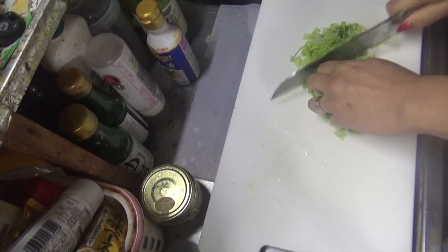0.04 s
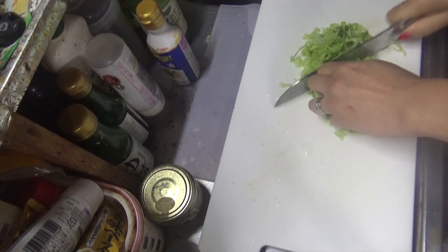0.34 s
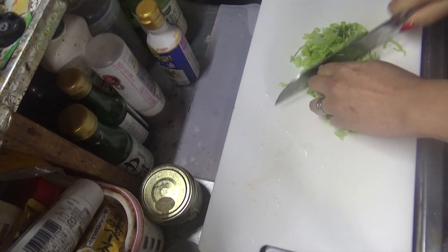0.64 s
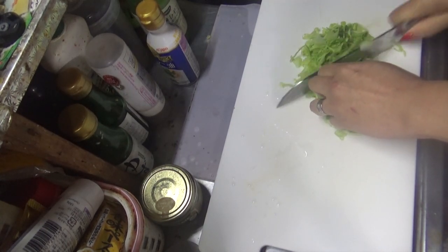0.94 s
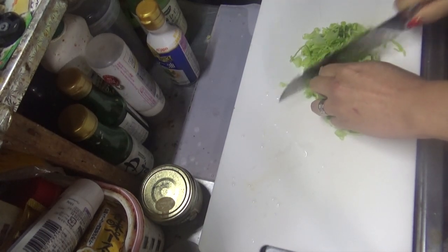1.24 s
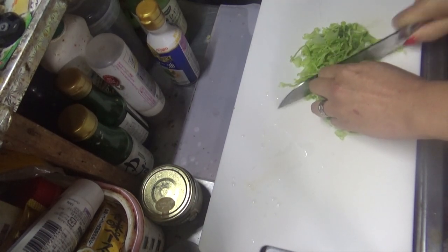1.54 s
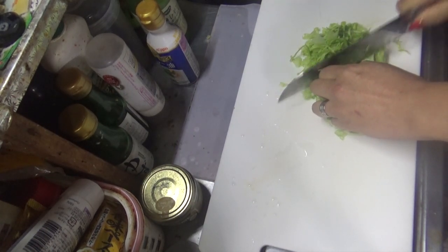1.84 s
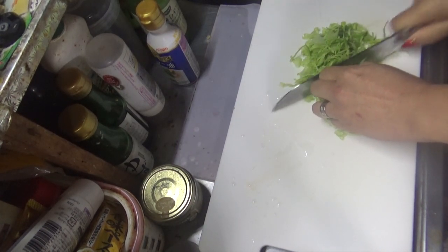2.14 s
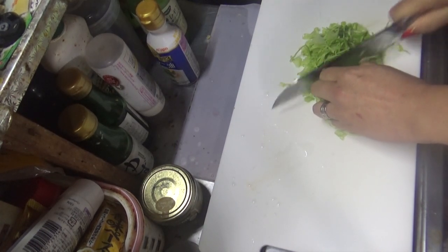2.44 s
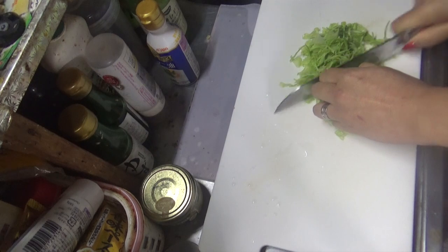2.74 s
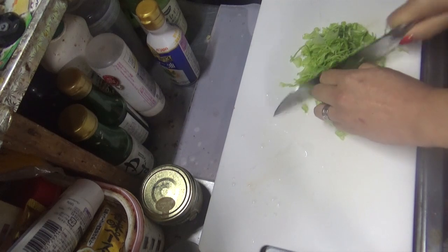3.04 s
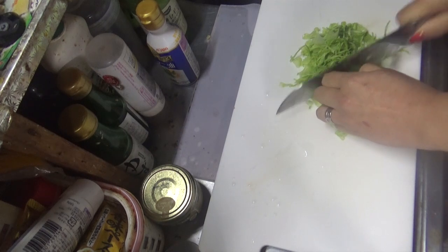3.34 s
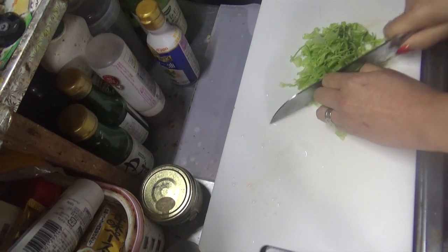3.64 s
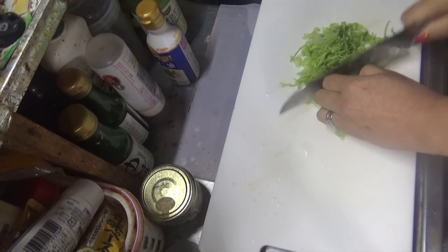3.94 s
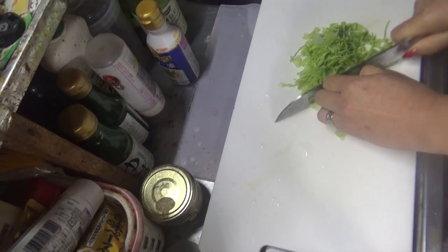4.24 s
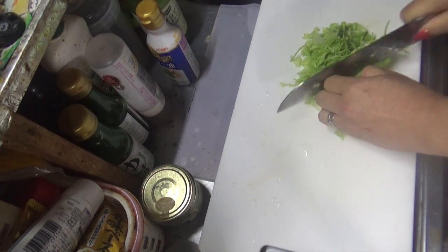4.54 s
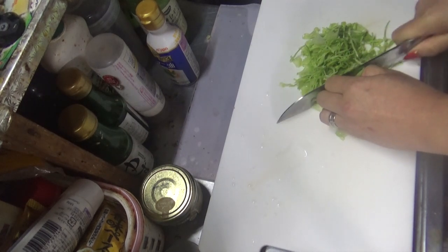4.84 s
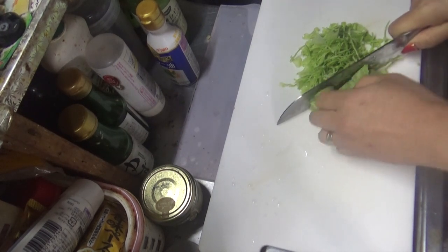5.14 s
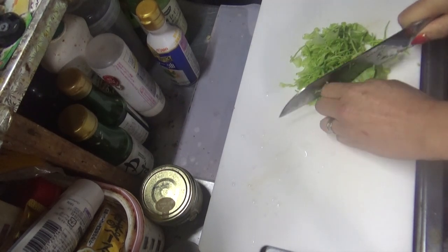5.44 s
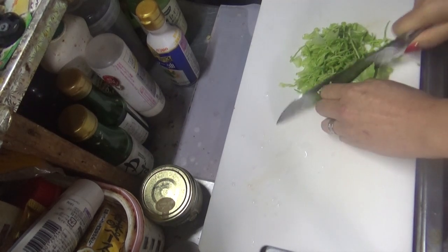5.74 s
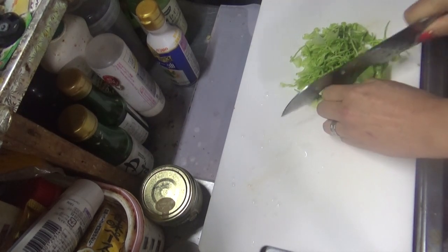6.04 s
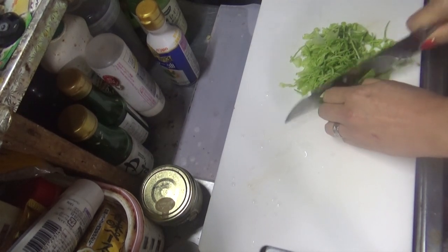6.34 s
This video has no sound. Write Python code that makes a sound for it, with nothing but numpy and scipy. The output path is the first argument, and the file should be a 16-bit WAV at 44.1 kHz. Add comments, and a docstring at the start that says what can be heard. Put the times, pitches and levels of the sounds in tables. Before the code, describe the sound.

Close, rapid crunches of cabbage being sliced, each with a light knock of knife on plastic board, pausing briefly before continuing.

```python
"""A kitchen knife shreds cabbage on a plastic board, about five strokes a second, with one pause to regather.
Crisp cells and ribs fail by brittle fracture, so each cut is a swarm of tiny impulses over a duller tearing.
The landing edge excites the damped modes of board and blade; on the way up, wet shreds crackle by stick-slip.
The microphone is close, in a small hard kitchen with a short reverberation and a faint hum and hiss."""
import sys
import numpy as np
from scipy import signal
from scipy.fft import rfft, irfft
from scipy.io import wavfile
from scipy.ndimage import uniform_filter1d

SR = 44100
rng = np.random.default_rng(int(sys.argv[2]) if len(sys.argv) > 2 else 0)


def dump(signal):
    """Clip the signal to [-1, 1] and save it as 16-bit WAV at the path in sys.argv[1]."""
    limited = np.clip(np.atleast_2d(signal).T, -1, 1)
    pcm = np.round(limited * 32767).astype(np.int16)
    wavfile.write(sys.argv[1], SR, pcm)


N = 289737
TIME = np.arange(N) / SR
TOP_HZ = 15650  # upper band limit


def undb(db):
    """Amplitude ratio of a level in decibels."""
    return 10 ** (np.asarray(db) / 20)


def unit(x):
    """Normalisation to unit energy."""
    return x / np.sqrt(np.sum(x ** 2))


def fade(t, t60):
    """Exponential decay, 60 dB in t60 seconds."""
    return np.exp(-np.log(1000) * t / t60)


def add(out, s, sound):
    """Superposition of a sound at time s."""
    i = max(int(s * SR), 0)
    out[i:i + len(sound)] += sound[:max(N - i, 0)]


def colour(x, spectrum, size=2048):
    """Minimum-phase filtering by the folded cepstrum; white input keeps its power."""
    hz, db = np.transpose(spectrum)
    bins = np.maximum(np.fft.rfftfreq(size, 1 / SR), 1)
    magnitude = undb(np.interp(np.log(bins), np.log(hz), db))
    cepstrum = irfft(np.log(magnitude))
    cepstrum[1:size // 2] *= 2
    cepstrum[size // 2 + 1:] = 0
    response = unit(irfft(np.exp(rfft(cepstrum))))
    return signal.fftconvolve(x, response)[:len(x)]


def swell(times, dbs, edge_s):
    """Amplitude envelope, piecewise linear in decibels, ramped at both ends."""
    ramp = np.clip(np.minimum(TIME - times[0], times[-1] - TIME) / edge_s + .5, 0, 1)
    gain, on = np.zeros(N), ramp > 0
    gain[on] = ramp[on] * undb(np.interp(TIME[on], times, dbs))
    return gain


def pips(spectrum, ring_s, even_s, count=12000):
    """Free vibration: each bursting cell or vein pings at its own pitch; mean power levelled to one."""
    out = np.zeros(N)
    t = np.arange(SR // 40) / SR
    decay = fade(t, ring_s)
    for when, pitch, size in rng.random((count, 3)):
        add(out, when * N / SR, (.5 + size) * np.sin(2 * np.pi * pitch * TOP_HZ * t) * decay)
    out = colour(out, spectrum)
    return out / np.sqrt(uniform_filter1d(out ** 2, int(even_s * SR)) + 1e-9)


def bursts(per_s, spread_db, ring_s, even_s):
    """Poisson process: fibres give way in unequal noise bursts; mean power levelled to one."""
    sizes = undb(spread_db * np.minimum(rng.exponential(size=N), 4))
    impulses = sizes * (rng.random(N) < per_s / SR)
    t = np.arange(SR // 50) / SR
    power = np.maximum(signal.fftconvolve(impulses ** 2, fade(t, ring_s) ** 2)[:N], 0) + 1e-9
    return rng.standard_normal(N) * np.sqrt(power / uniform_filter1d(power, int(even_s * SR)))


# Spectra of bursting cells, torn fibres and fine spray: f/Hz, density level/dB
CELL_SPECTRUM = [(60, -55), (200, -25.5), (500, -26.5), (1000, -43), (3000, -13), (4800, -15.5), (5700, -8),
                 (6400, 1), (7500, -1.5), (8700, -10), (12000, -12.5), (14000, -17), (16000, -43)]
FIBRE_SPECTRUM = [(25, -59), (60, -17.5), (150, -3.5), (400, -5.5), (800, -2.5), (1100, -5), (1700, 3.5),
                  (2600, -4.5), (4000, 0.5), (6000, 2.5), (12000, -10)]
SPRAY_SPECTRUM = [(60, -56), (5000, -51), (8000, 12.5), (9500, 1.5), (12000, 10), (14000, -9), (16000, 12)]
# Knife strokes: entry t/s, landing t/s, crunch level/dB, first bite/dB re crunch, spray/dB re crunch,
# knock level/dB, thud/dB re knock, clack level/dB, rubbing level/dB
KNIFE_STROKES = [(.002, 0.011, -11, 10, -5, -23.5, -7.5, -31, -41),
                 (0.18, 0.215, -12, -1, 4, -22, -10.5, -41, -36),
                 (0.377, .409, -12, 4, 2.5, -25.5, -3, -38, -31),
                 (0.562, 0.62, -11, -9.5, -16, -23, -3.5, -22, -29.5),
                 (0.776, 0.814, -10.5, -2.5, 2, -24, -9, -45, -29.5),
                 (0.97, 1.006, -11, 1.5, 3, -24.5, -4.5, -22.5, -25.5),
                 (1.158, 1.207, -13, -9.5, -3, -25.5, -0.5, -52, -34.5),
                 (1.374, 1.406, -11, -4.5, 4, -26, -2, -52, -28.5),
                 (1.561, 1.587, -21, -9, 12, -25, 1, -24, -27),
                 (1.762, 1.794, -17.5, -4.5, -12, -25, 2.5, -22.5, -34),
                 (1.966, 2.012, -14.5, -5.5, 6, -33.5, -1, -51, -27.5),
                 (2.16, 2.211, -16.5, -5.5, -10, -25.5, 1, -23, -30),
                 (2.36, 2.405, -19.5, -3, -16, -25.5, 3, -21.5, -28),
                 (2.565, 2.609, -11.5, -6.5, -16, -25.5, -2, -21, -29.5),
                 (2.772, 2.815, -11, -4.5, 0, -31.5, -3, -36, -35.5),
                 (2.979, 3.027, -13, -4, -2, -26, -1.5, -58, -37),
                 (3.195, 3.231, -11.5, -0.5, 4, -24.5, -4, -45, -30.5),
                 (3.409, 3.448, -11, -7.5, -1, -27, -3.5, -29, -26),
                 (3.603, 3.65, -12, -8, -12, -27.5, 0, -28, -25.5),
                 (3.799, 3.843, -11, -10.5, -6, -26.5, 0.5, -23.5, -26.5),
                 (4.016, 4.062, -12, 0.5, -18, -40, 5, -55, -27),
                 (4.235, 4.265, -10, -6, -3, -26.5, 1, -26, -27),
                 (4.446, 4.485, -10.5, -10, 7, -29, -0.5, -50, -26),
                 (4.644, 4.689, -10.5, -14, -8, -26.5, -0.5, -25, -31),
                 (4.857, 4.89, -14.5, -5, -15, -27, -1.5, -30, -44),
                 (5.662, 5.709, -12.5, -6, -18, -30.5, 1.5, -35, -31),
                 (5.897, 5.949, -10.5, -3.5, 5, -33.5, 0.5, -53, -39),
                 (6.149, 6.199, -12.5, -4, -4, -30, 0, -42, -31),
                 (6.403, 6.458, -10, -4, 5.5, -30.5, -2, -53, -47)]
# The heel of the blade drops after some strokes: t/s, crunch level/dB, knock level/dB
HEEL_DROPS = [(1.621, -24, -26.5), (1.823, -23.5, -27.5), (4.29, -20.5, -28), (4.918, -38.5, -40)]


def cutting():
    """Brittle fracture: the edge bursts cells, and fibres tear more as the pile is compressed."""
    lag_s, bite_s, press_s, graze_s = .001, .004, .032, .008
    midway_db, pinch_db, press_db, release_db = -1.05, -0.06, -15, -25
    squeeze_db = 3 * np.array([-3.0, -1.6, -1.5, 0.08, 1.2, -1.0])
    heel_s, heel_bite_db, heel_spray_db = .025, 2.5, -21
    cuts = [(enters, lands + lag_s, db, bite_db, spray_db)
            for enters, lands, db, bite_db, spray_db, *_ in KNIFE_STROKES]
    cuts += [(s, s + heel_s, db, heel_bite_db, heel_spray_db) for s, db, _ in HEEL_DROPS]
    crisp, dull, fine = np.zeros((3, N))
    for start, end, db, bite_db, spray_db in cuts:
        descent = np.interp([0, 1 / 6, 1 / 2, 7 / 8], [0, 1], [start, end])
        times = [*descent, end + press_s / 2, end + press_s]
        shape_db = np.array([bite_db, bite_db, midway_db, pinch_db, press_db, release_db])
        push = swell(times, db + shape_db, edge_s=bite_s)
        graze = swell([start - graze_s, start], [db - 24, db - 14], edge_s=0.0013)  # loose top shreds
        tear_db = -10.5 + 0.49 * db - 0.92 * start  # falls as the knife reaches crisper leaves
        crisp = np.maximum(crisp, push + graze)
        fine = np.maximum(fine, push * undb(spray_db))
        dull = np.maximum(dull, swell(times, tear_db + shape_db + squeeze_db, edge_s=bite_s))
    cells = crisp * pips(CELL_SPECTRUM, ring_s=.018, even_s=.008)
    cracks = crisp * bursts(per_s=1500, spread_db=0.5, ring_s=0.0033, even_s=0.0042)
    spray = fine * bursts(per_s=3700, spread_db=5, ring_s=0.0052, even_s=0.013)
    fibres = dull * bursts(per_s=1200, spread_db=2.5, ring_s=0.0043, even_s=0.021)
    veins = dull * pips(FIBRE_SPECTRUM, ring_s=.025, even_s=.012)
    return (undb(-3) * cells + undb(-2.5) * colour(cracks, CELL_SPECTRUM)
            + undb(-10) * colour(spray, SPRAY_SPECTRUM)
            + undb(-1.5) * colour(fibres, FIBRE_SPECTRUM) + undb(-4.5) * veins)


# Spectrum of the ambient noise: f/Hz, density level/dB
KITCHEN_SPECTRUM = [(18, -38), (30, -25), (117, -16.5), (389, -8), (479, -14.5), (787, -4.5), (874, -20),
                    (996, -9.5), (1230, -20), (3230, -15), (4540, -14), (7080, -6), (8720, -10),
                    (15500, -16)]


def kitchen_noise():
    """Stationary filtered noise: the faint hum and hiss of the kitchen."""
    return undb(-49) * colour(rng.standard_normal(N), KITCHEN_SPECTRUM)


def landings():
    """Impacts that excite blade and board: t/s, knock level/dB, thud/dB re knock, clack level/dB."""
    heel_thud_db, heel_clack_db = 4.5, -39
    edges = [(lands, db, thud_db, clack_db) for _, lands, *_, db, thud_db, clack_db, _ in KNIFE_STROKES]
    return edges + [(s, db, heel_thud_db, heel_clack_db) for s, _, db in HEEL_DROPS]


# Modes of the steel blade, damped by the hand: f/Hz, level/dB, T60/s
BLADE_MODES = [(1630, -3, 0.071), (2017, 8.5, 0.013), (2338, 4, 0.034), (2610, 3, 0.034), (2742, -1, 0.11),
               (3480, -19, 0.15), (5300, -23, 0.084), (6250, -1.5, 0.056), (8350, -15, 0.045)]
# Light taps of the blade between strokes: t/s, level/dB
BLADE_TAPS = [(.134, -48), (1.322, -49), (5.265, -54), (5.335, -49)]


def blade_ringing(crunch):
    """Forced and free vibration: the crunch drives the blade's modes, and impacts make them clack."""
    t = np.arange(SR // 6) / SR
    hz, mode_db, t60 = np.transpose(BLADE_MODES)[:, :, None]
    decays = undb(mode_db) * fade(t, t60)  # one row a mode
    response = unit(np.sum(decays * np.sin(2 * np.pi * hz * t), axis=0))
    out = undb(-18) * signal.fftconvolve(crunch, response)[:N]
    contact = fade(t, t60=0.075) * (1 - np.exp(-t / 0.0008))  # the board adds damping
    for s, *_, clack_db in landings() + BLADE_TAPS:
        # The point of contact weights and detunes the modes.
        spot, load, phase = rng.standard_normal((3, len(hz), 1))
        tones = np.sin(2 * np.pi * (hz * (1 + 0.012 * load) * t + phase))
        ring = np.sum(decays * undb(2 * spot) * tones, axis=0)
        add(out, s - .002, undb(clack_db + 4.5) * ring * contact)
    return out


# Modes of the board on its counter: f/Hz, level/dB, T60/s
BOARD_MODES = [(70.4, -33.5, 0.62), (144, -12.5, 0.22), (164.5, -32, 0.24), (221.9, 4, 0.11),
               (248.3, 7.5, 0.099), (273.8, -7, 0.19), (325.7, -10.5, 0.27), (371.1, -0.3, 0.21),
               (394.5, -11, 0.27), (471, 1, 0.19), (521, -3.5, 0.12), (579, -4, 0.2), (612.5, -8.5, 0.26),
               (637, -4.5, 0.17), (705.5, 0.5, 0.06), (799, -9, 0.21), (772, -0.5, 0.05), (842, -8.5, 0.23),
               (892, -3, 0.1), (858, -26, 0.69), (1070, -7.5, 0.14), (1197, -2.5, 0.062), (1360, -14, 0.15)]
# Spectrum of the edge's blow: f/Hz, density level/dB
BLOW_SPECTRUM = [(25, -48), (50, -26), (150, -5), (250, -20.5), (450, -1.5), (750, 5), (1100, -7.5),
                 (2500, -14.5), (5000, -22), (12000, -39)]


def board_knocking():
    """Impact excitation: a short broadband blow, and plate modes that build up over a few cycles."""
    modes, blows = np.zeros((2, N))
    t = np.arange(SR // 4) / SR
    hz, mode_db, t60 = np.transpose(BOARD_MODES)[:, :, None]
    build_cycles, thud_hz, upper_hz = .8, 320, 550
    envelopes = fade(t, t60) * (1 - np.exp(-t * hz / build_cycles))
    polarity = (-1) ** np.arange(len(hz))[:, None]
    for s, db, thud_db, _ in landings():
        upper_db = -3 + 0.78 * s  # upper modes gain as the knife works across the board
        band_db = np.where(hz < thud_hz, thud_db, 0) + np.where(hz > upper_hz, upper_db, 0)
        # Each stroke lands on a different spot and loads the board differently.
        spot, load, phase = rng.standard_normal((3, len(hz), 1))
        gains = polarity * undb(mode_db + 2 * spot + band_db)
        tones = np.sin(2 * np.pi * hz * (1 + 0.0096 * load) * t + .5 * phase)
        add(modes, s, undb(db + 3.5) * np.sum(gains * envelopes * tones, axis=0))
        blow = rng.standard_normal(len(t)) * fade(t, t60=0.08) * (1 - np.exp(-t / 0.00023))
        add(blows, s, undb(db + upper_db / 2 + 7) * blow)
    return modes + colour(blows, BLOW_SPECTRUM)


# Thick ribs breaking, and at 5.266 and 5.333 s the click of the blade lightly tapping the board in the pause:
# t/s, level/dB
RIB_SNAPS = [(.074, -18), (0.134, -26.5), (.181, -9), (0.317, -24), (0.577, -5), (0.971, -8), (1.156, -10),
             (1.17, -18), (1.378, -1), (1.587, -2.5), (1.645, -10.5), (1.765, -14), (1.793, -8),
             (1.834, -6.5), (1.916, -17), (2.054, -24), (2.405, -7.5), (2.481, -21.5), (2.543, -13),
             (2.569, -5.5), (3.418, -2), (3.531, -15), (3.553, -17), (3.804, -5.5), (4.121, -22),
             (4.145, -14.5), (4.302, -8), (4.313, -6.5), (4.445, -7), (4.451, -17), (4.65, -3.5),
             (4.869, -6.5), (4.988, -22.5), (5.011, -17.5), (5.033, -18), (5.266, -25), (5.333, -33),
             (5.43, -32), (5.487, -21.5), (5.585, -49), (5.659, -9.5), (6.151, -7), (6.16, -10),
             (6.411, -10), (6.478, -14)]
# Spectrum of a snap's dull tail: f/Hz, density level/dB
RIB_SPECTRUM = [(100, -19), (1200, -21), (1800, -4), (3200, 2), (4500, -4), (12000, -5.5)]


def snapping():
    """Fracture transients: a rib or loose shred breaks, or the blade lightly taps the board, with a click, a
    ping and a dull tail."""
    bright, dull = np.zeros((2, N))
    t = np.arange(SR // 30) / SR
    strays_per_s, stray_db, scatter_db = 10, -29, 10
    strays = [(when * N / SR, stray_db + scatter_db * (2 * size - 1))
              for when, size in rng.random((int(strays_per_s * N / SR), 2))]
    for s, db in RIB_SNAPS + strays:
        click, tail = undb(db) * rng.standard_normal((2, len(t)))
        ping_hz = rng.uniform(5240, 8170)
        ping = undb(db - 24.5) * np.sin(2 * np.pi * ping_hz * t) * fade(t, t60=0.031)
        add(bright, s, click * fade(t, t60=0.0087) + ping)
        add(dull, s, tail * fade(t, t60=0.087))
    return colour(bright, CELL_SPECTRUM) + undb(-18.5) * colour(dull, RIB_SPECTRUM)


# The flat of the blade scrapes as it pulls free of the pile: t/s, level/dB
EXIT_SCRAPES = [(1.318, -28.5), (3.136, -27.5), (3.74, -23.5), (3.934, -20), (4.16, -32), (5.827, -33.5)]
# The hand regathers the pile in the pause: start t/s, end t/s, level/dB
HAND_GATHERS = [(5.014, 5.115, -37), (5.21, 5.256, -41)]


def rubbing():
    """Stick-slip friction: wet shreds cling to the rising blade or the hand and slip off in crackles."""
    delay_s, lift_s, scrape_s = 0.07, 0.066, 0.016
    cling_db = np.array([-2.5, -2.5, 0, -17.5])  # strongest just before the shreds let go
    lifts = [(lands + delay_s, lands + delay_s + lift_s, db) for _, lands, *_, db in KNIFE_STROKES]
    moves = lifts + HAND_GATHERS
    exits = sum(swell([s, s + scrape_s], [db, db], edge_s=0.006) for s, db in EXIT_SCRAPES)
    crisp = sum(swell(np.linspace(start, end, 4), db + cling_db, edge_s=0.019)
                for start, end, db in moves)
    crisp = np.maximum(crisp, exits)
    dull = sum(swell([start, end], [db - 4.5, db], edge_s=0.01) for start, end, db in moves)
    dull = np.maximum(undb(-16.5) * dull, undb(-11) * exits)
    slips = bursts(per_s=700, spread_db=1.5, ring_s=0.018, even_s=0.049)
    cells = undb(-4.5) * crisp * pips(CELL_SPECTRUM, ring_s=.02, even_s=.02, count=9000)
    crackle = undb(-7.5) * colour(crisp * slips, CELL_SPECTRUM)
    return cells + crackle + colour(dull * slips, FIBRE_SPECTRUM)


def room(x, wet_db, low_t60, high_t60, split_hz):
    """Reverberation: tiles and cupboards return a diffuse tail after 4 ms, decaying in two bands."""
    t = np.arange(SR * 3 // 4) / SR
    noise = rng.standard_normal(len(t))
    low = signal.sosfilt(signal.butter(2, split_hz, fs=SR, output="sos"), noise)
    high = signal.sosfilt(signal.butter(2, split_hz, "high", fs=SR, output="sos"), noise)
    onset = np.clip(t / 0.004 - 1, 0, 1)
    tail = (low * fade(t, low_t60) - high * fade(t, high_t60)) * onset
    return x + undb(wet_db) * signal.fftconvolve(x, unit(tail))[:N]


def scene():
    """Superposition of cabbage, blade and board in the kitchen, in one channel."""
    cabbage = cutting() + rubbing() + snapping()
    direct = cabbage + blade_ringing(cabbage) + board_knocking()
    reverberant = room(direct, wet_db=-17.0, low_t60=0.32, high_t60=0.26, split_hz=2200)
    return (reverberant + kitchen_noise())[None]


def record(dry):
    """Band limiting and saturation: the microphone sheds deep bass, clips peaks and cuts the top."""
    lean = signal.sosfilt(signal.butter(2, 55, "high", fs=SR, output="sos"), dry)
    clipped = np.clip(lean, -.92, .92)
    return signal.sosfilt(signal.ellip(10, .1, 80, TOP_HZ, fs=SR, output="sos"), clipped)


dry = scene()
out = record(dry)
dump(out)
```